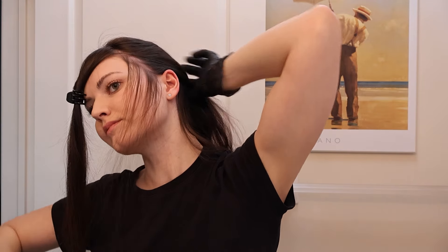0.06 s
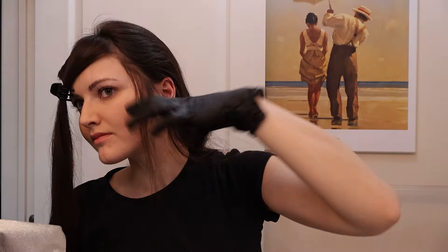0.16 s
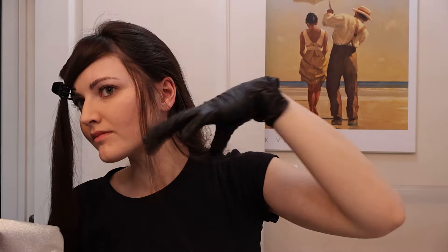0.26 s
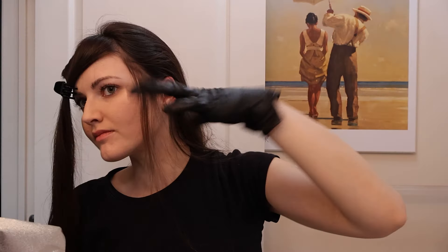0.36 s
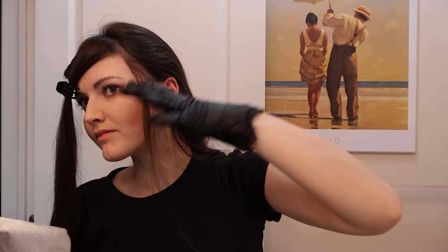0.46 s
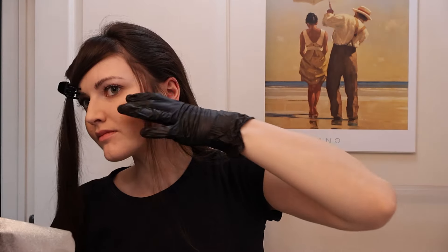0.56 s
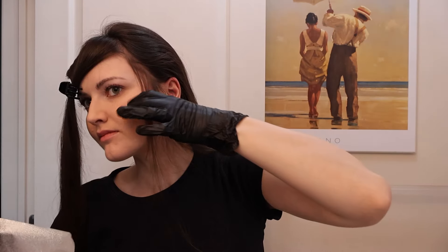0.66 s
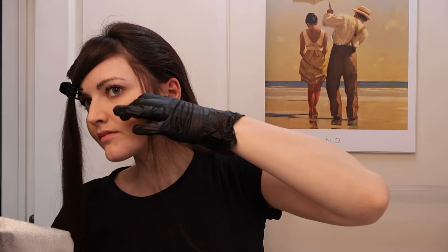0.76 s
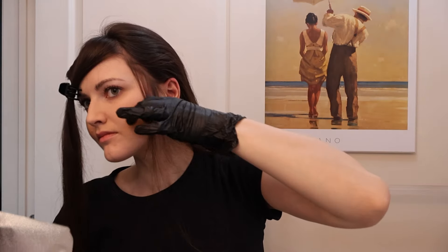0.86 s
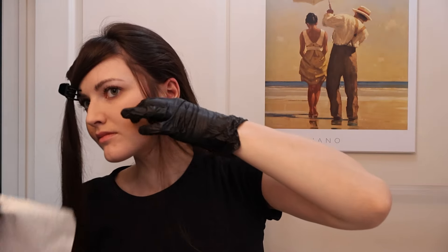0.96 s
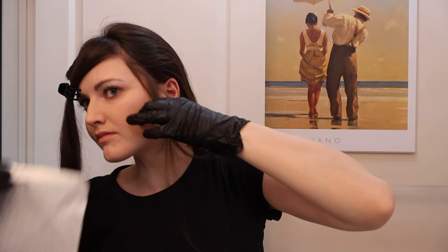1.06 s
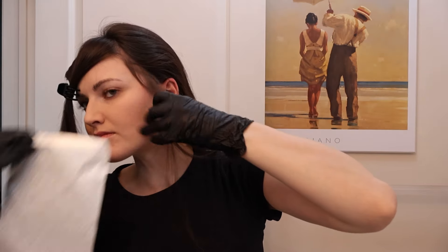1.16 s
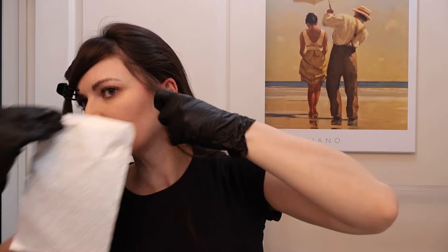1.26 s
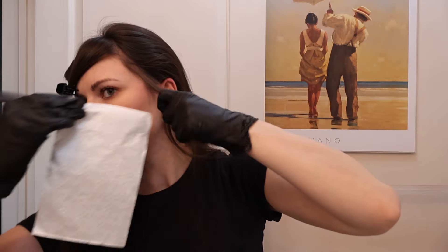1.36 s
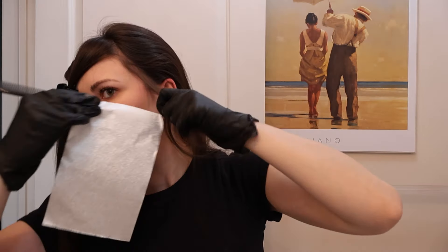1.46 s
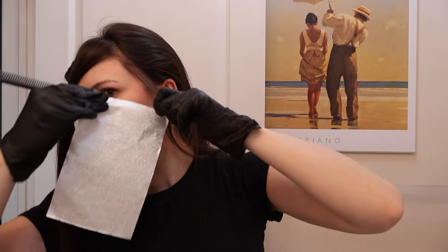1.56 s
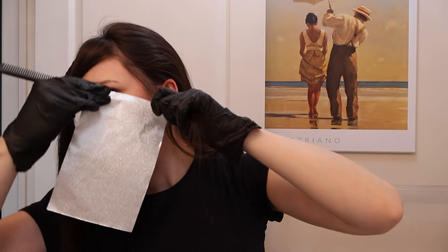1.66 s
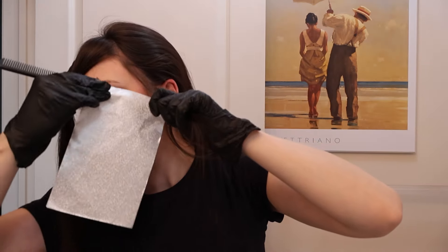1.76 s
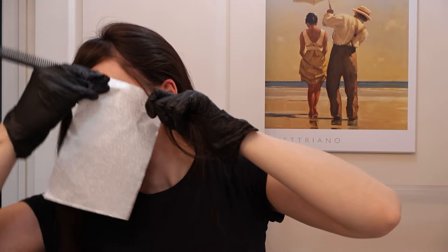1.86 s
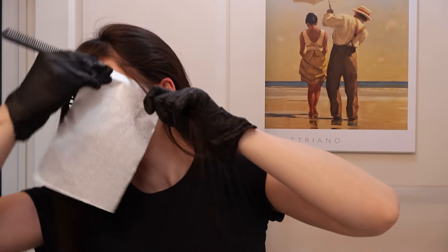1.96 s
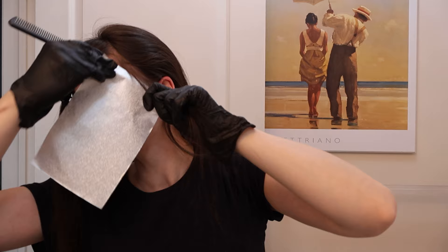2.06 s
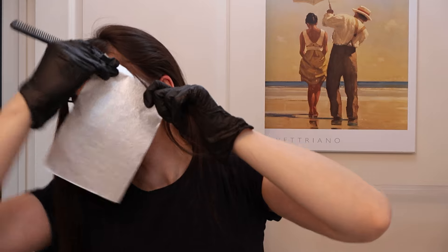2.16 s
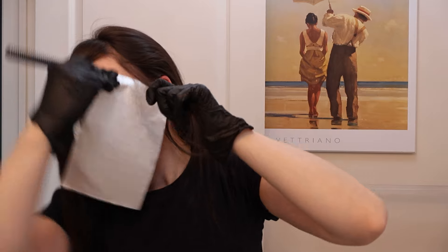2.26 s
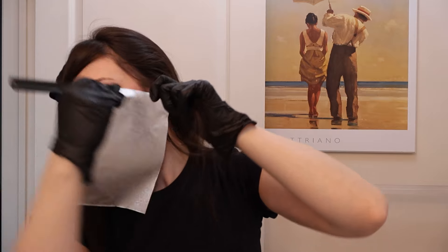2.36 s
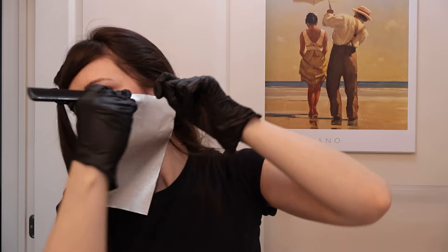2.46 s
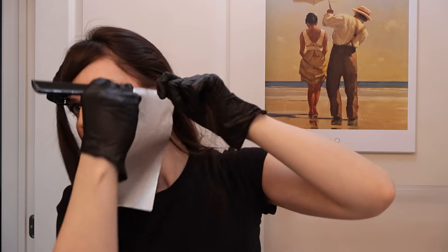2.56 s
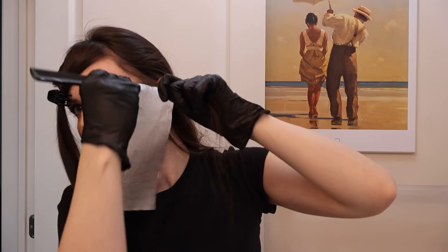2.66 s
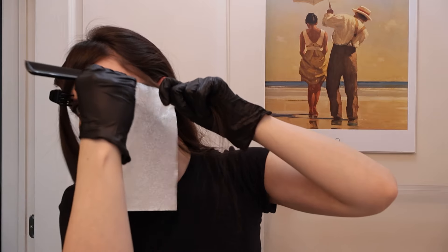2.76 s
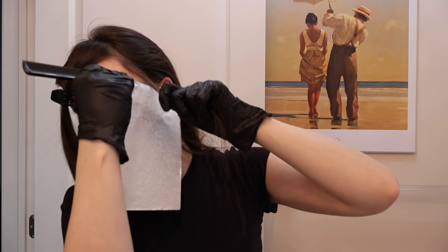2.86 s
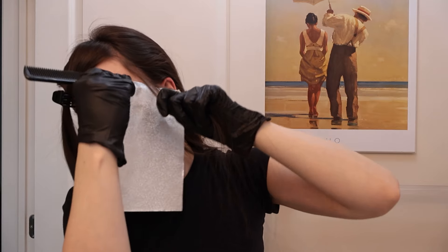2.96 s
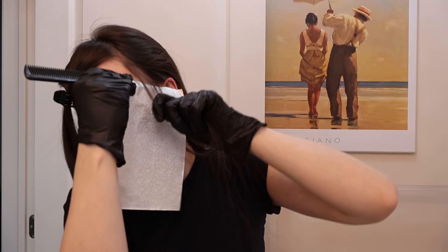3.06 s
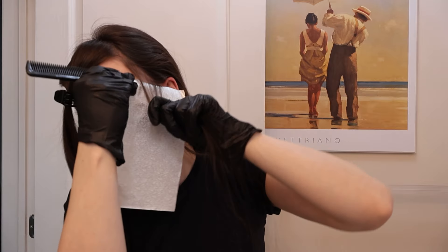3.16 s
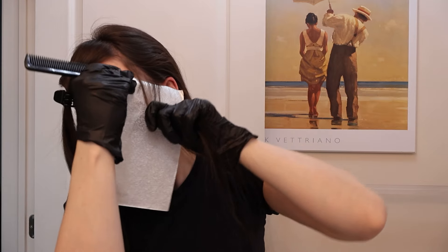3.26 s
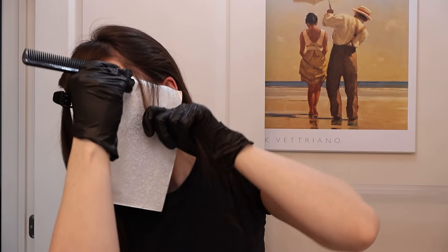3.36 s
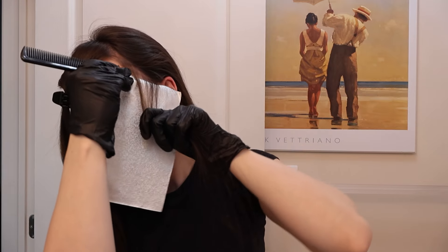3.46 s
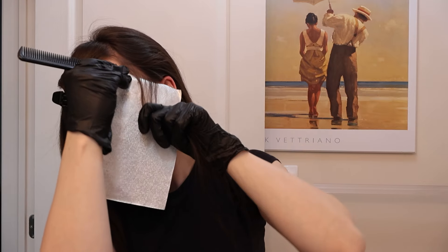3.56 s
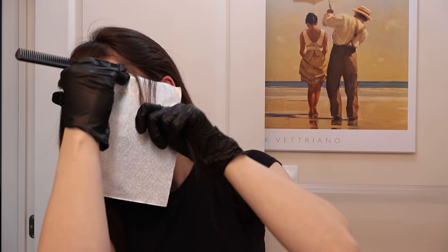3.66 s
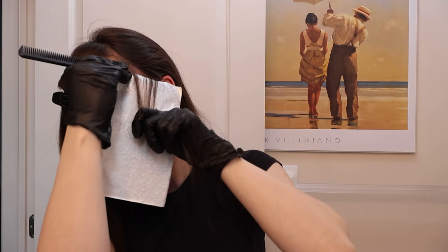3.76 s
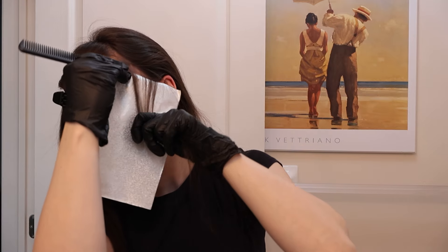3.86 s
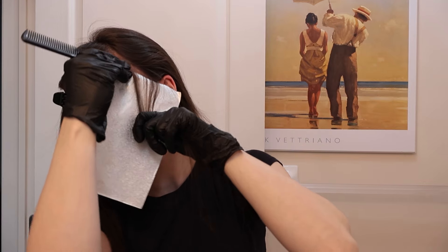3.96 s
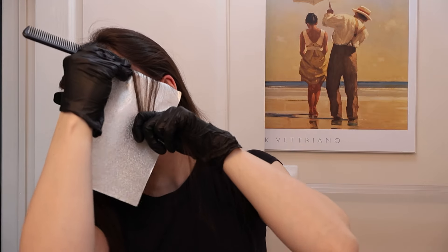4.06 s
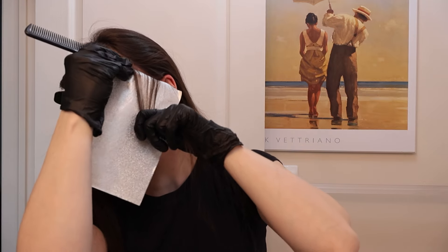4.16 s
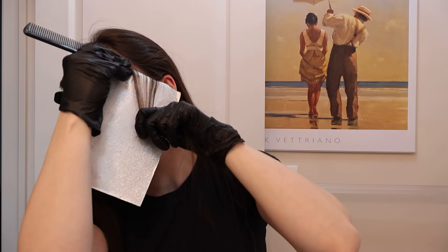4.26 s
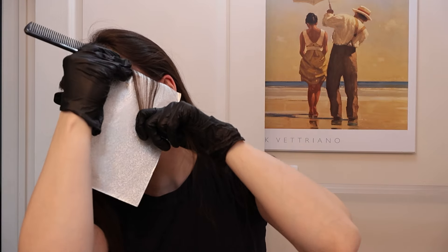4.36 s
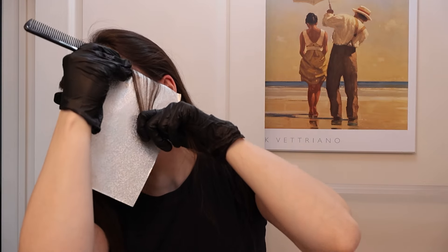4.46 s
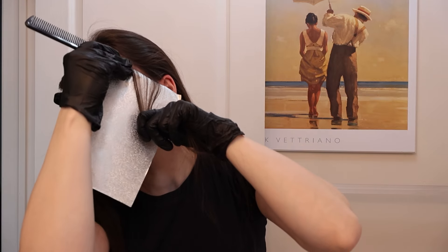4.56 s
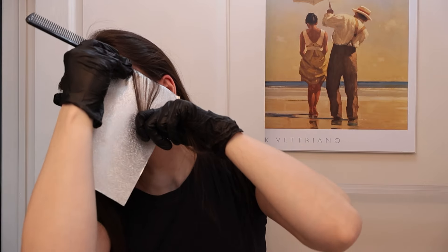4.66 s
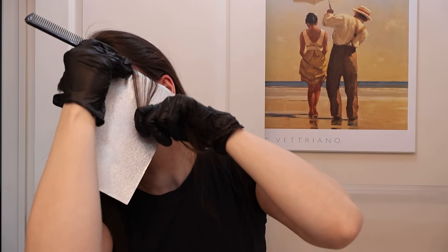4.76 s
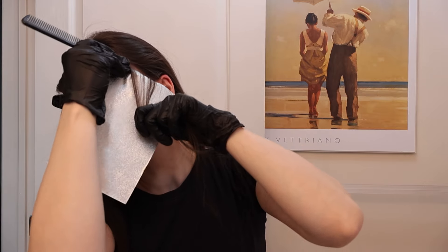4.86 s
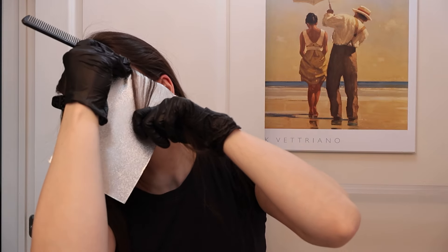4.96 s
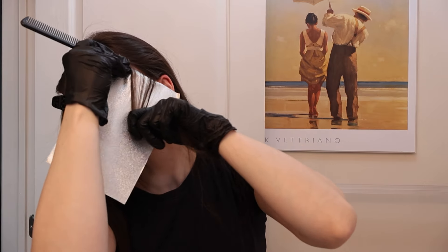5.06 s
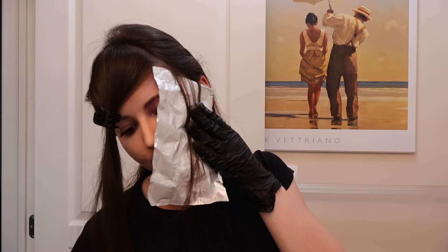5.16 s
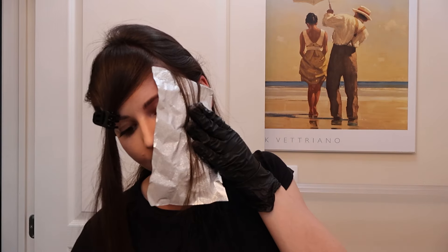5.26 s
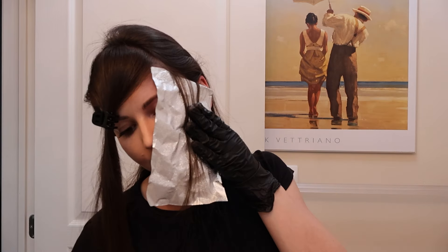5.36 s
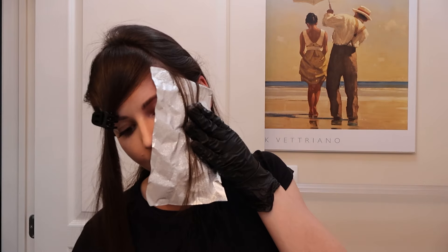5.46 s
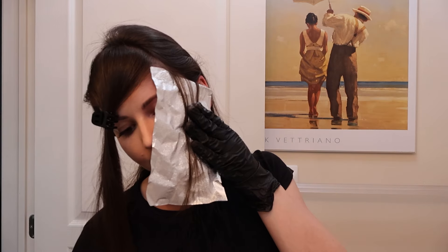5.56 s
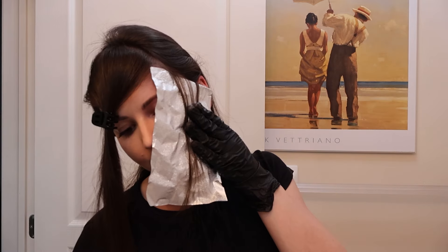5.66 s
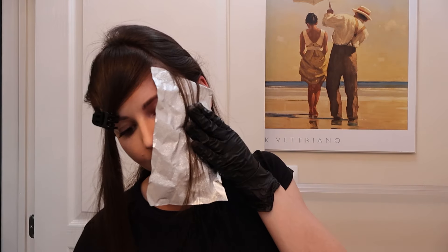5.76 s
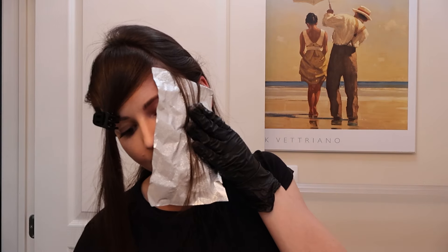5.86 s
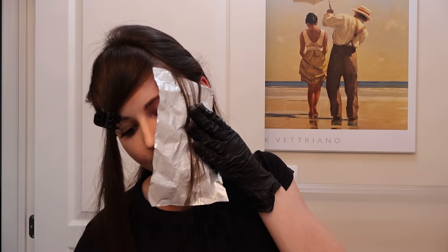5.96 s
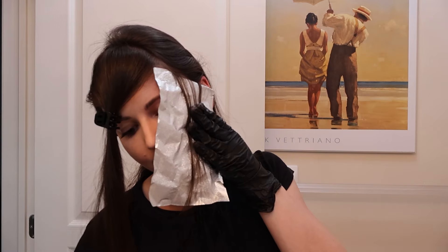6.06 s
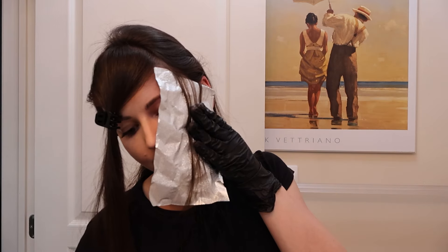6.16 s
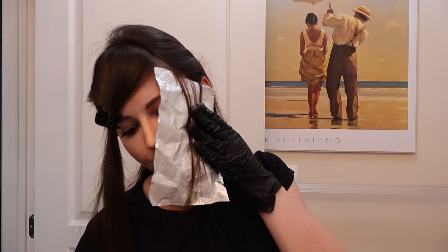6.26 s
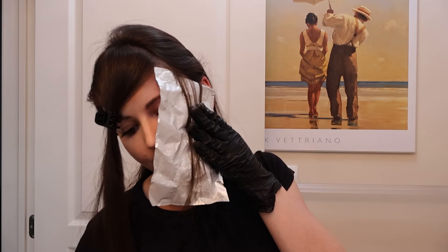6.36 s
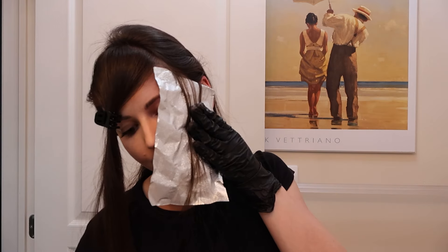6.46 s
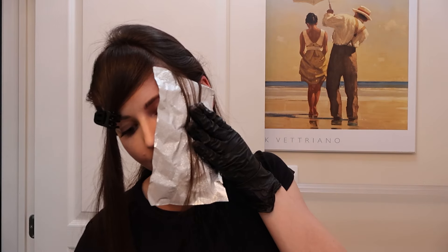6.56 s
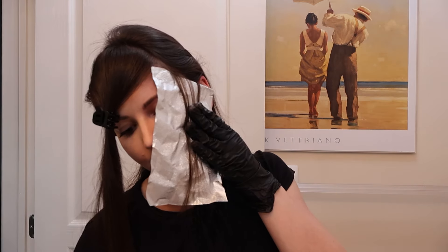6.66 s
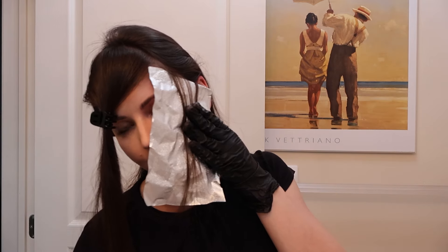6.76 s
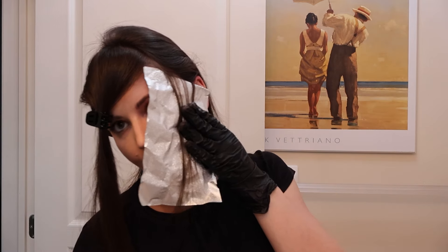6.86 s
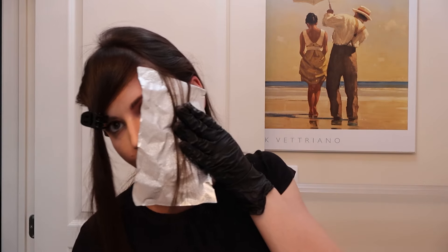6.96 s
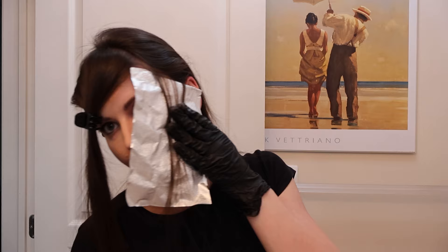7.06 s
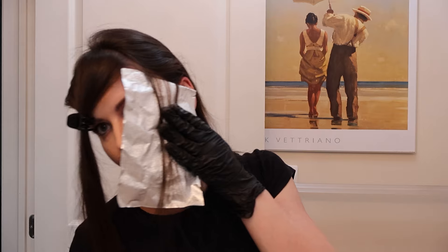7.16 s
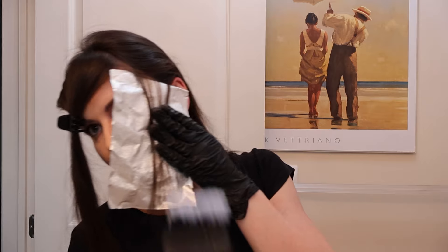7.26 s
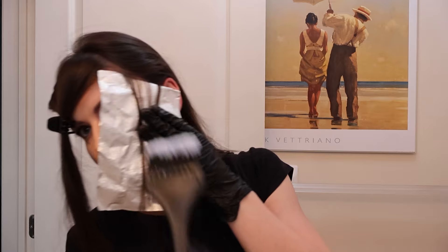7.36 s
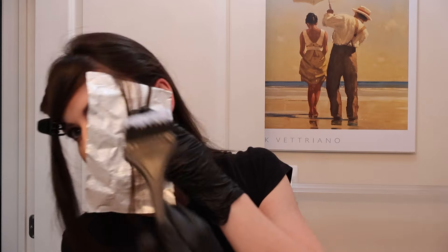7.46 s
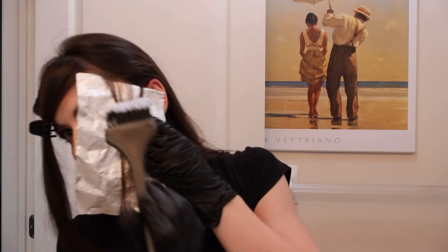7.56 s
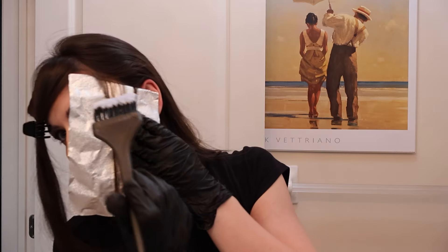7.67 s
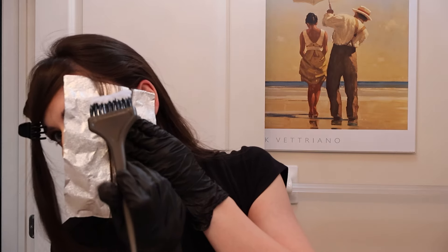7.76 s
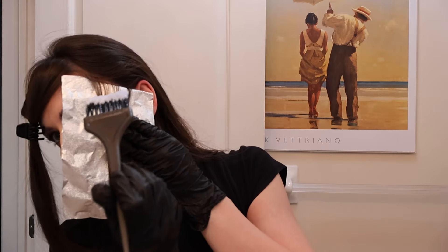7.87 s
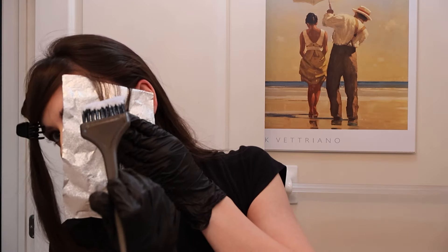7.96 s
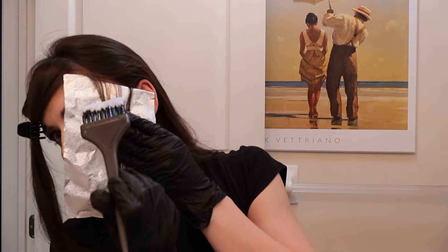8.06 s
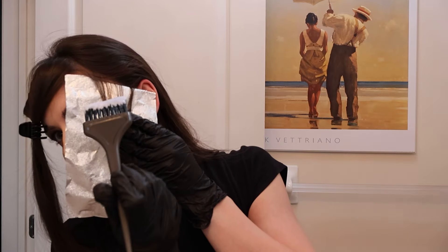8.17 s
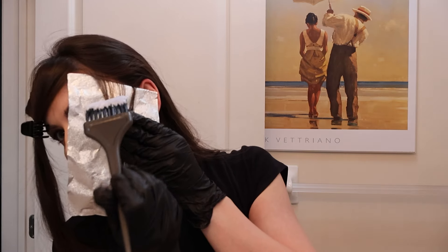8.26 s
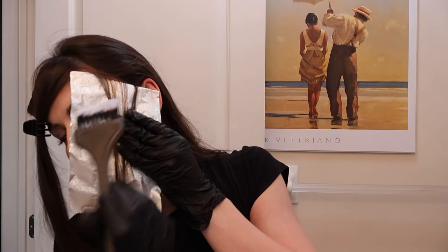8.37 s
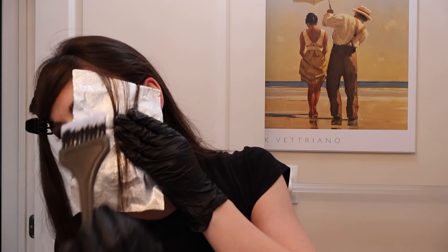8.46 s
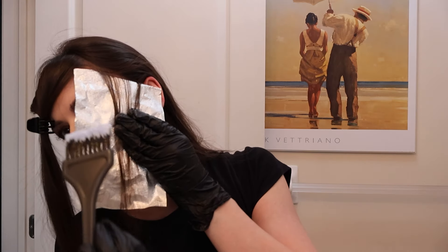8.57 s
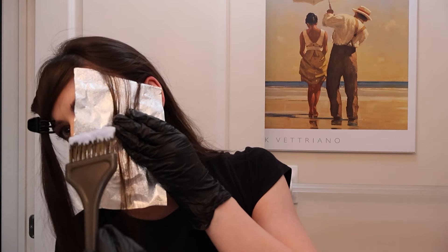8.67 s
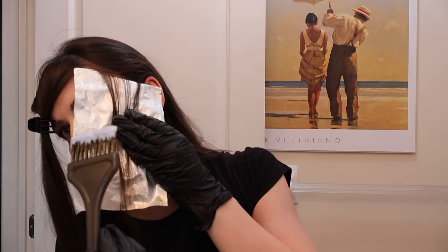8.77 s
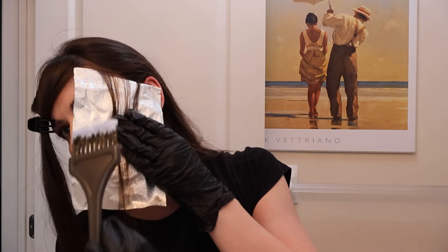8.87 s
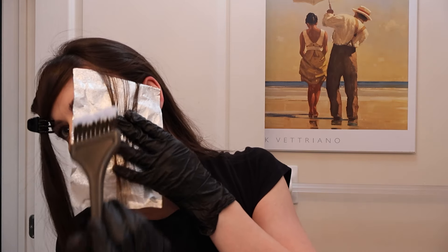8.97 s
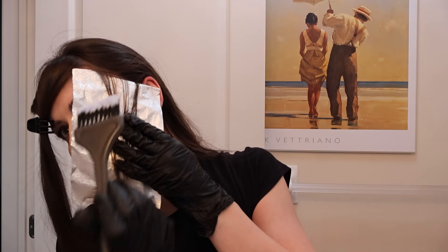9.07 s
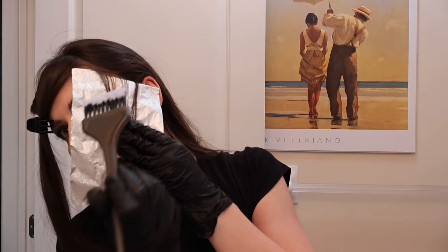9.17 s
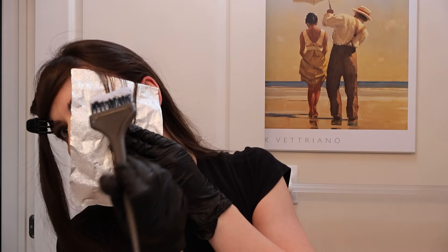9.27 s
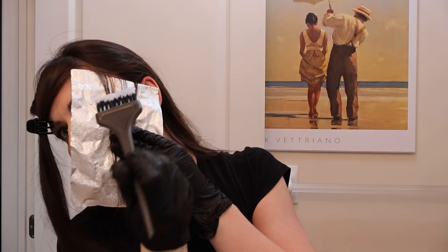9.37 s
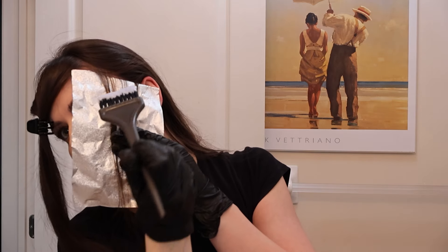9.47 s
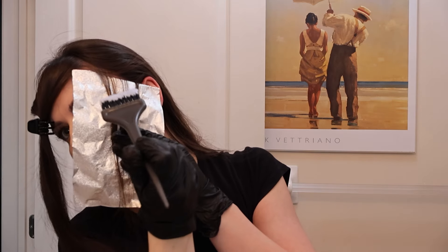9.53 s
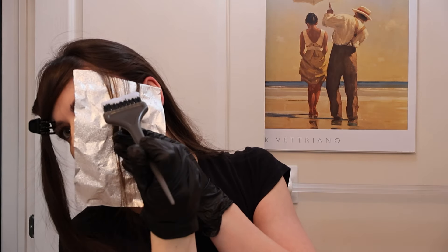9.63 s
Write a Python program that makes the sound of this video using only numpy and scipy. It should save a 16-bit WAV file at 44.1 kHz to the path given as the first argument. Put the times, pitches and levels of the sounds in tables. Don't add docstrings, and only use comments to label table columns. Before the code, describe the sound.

Aluminium foil crackles and snaps in gloved hands in a small room, then stiff brush dabs scratch and tick across the sheet.

```python
import sys
import numpy as np
from scipy import signal
from scipy.fft import rfft, irfft
from scipy.io import wavfile
from scipy.ndimage import uniform_filter1d

SR = 44100
rng = np.random.default_rng(int(sys.argv[2]) if len(sys.argv) > 2 else 0)


def gain_from_db(level_db):
    decades = np.asarray(level_db, float) / 20
    return 10 ** decades


def put_to_file(sound):
    columns = np.atleast_2d(sound).T
    safe = np.clip(columns, -1, 1)
    whole_steps = np.round(safe * 32767)
    wavfile.write(sys.argv[1], SR, whole_steps.astype(np.int16))


N = 427769
T = np.arange(N) / SR
SPLICE_S = 5.153
TOP_HZ = 15900

# start_s [s], peak_db [dB], panel_hz [Hz], whole_sheet_share_db [dB]
LIFT_SNAPS = [(0.452, -43, 1040, 2), (1.269, -31, 5020, -17), (1.591, -14, 2130, -14.5),
              (1.855, -19.5, 2410, -14.5), (2.032, -20, 2380, -13), (2.293, -21.5, 6700, -10.5),
              (2.359, -29.5, 1240, -8), (2.402, -18, 2700, -4), (2.514, -15, 3070, -16),
              (2.657, -15, 2280, -14), (2.749, -20, 8900, -16), (2.859, -22, 7210, -7),
              (2.909, -28, 1230, -20), (2.952, -19, 2770, -25)]
SETTLE_SNAPS = [(3.211, -24, 8270, -12), (3.358, -40, 8400, 1), (3.424, -17, 2490, -23),
                (3.729, -44, 2420, -2), (3.809, -33, 8600, -6), (3.988, -23.5, 3080, -4),
                (4.002, -20.5, 6640, -1.5), (4.484, -20.5, 5140, -13), (4.522, -23.5, 5300, -14),
                (4.675, -34, 690, -2.5), (4.918, -27.5, 10000, -10), (5.015, -35, 8350, -9)]
BRUSH_SNAPS = [(5.679, -40.5, 5910, -6), (6.594, -49, 4680, -2), (6.88, -26.5, 3200, -10),
               (7.127, -44, 4950, 0), (7.171, -37, 8850, -3), (7.182, -34, 8700, -2),
               (7.229, -36, 8900, -8), (7.315, -36, 8910, 0), (8.068, -39, 8740, -14),
               (8.297, -30, 8440, -12), (8.479, -31.5, 860, -2), (8.526, -18, 9000, -1),
               (8.542, -16, 12600, -6), (8.616, -26, 8650, -12), (8.867, -36, 5000, -6),
               (8.89, -34, 8500, -2.5), (9.049, -14, 13400, -12.5), (9.235, -19.5, 2900, -15.5),
               (9.324, -16, 9300, -12), (9.384, -34, 8500, -9), (9.47, -39, 7950, -8),
               (9.593, -32, 8100, 1.5)]
DRY_TICKS = [(1.198, -35, 5800, -25), (1.251, -44, 8860, -2), (1.415, -38, 7900, -2.5),
             (1.5804, -17, 8450, -6), (2.571, -19.5, 2800, -16), (3.1064, -24, 8850, -13),
             (4.774, -33, 8920, -9), (5.547, -42, 8800, -7), (5.888, -41, 3670, -9.5),
             (5.978, -42, 4700, -7), (8.623, -30, 8900, -8), (8.661, -19, 12800, -25),
             (8.67, -31, 13200, 1), (8.727, -26, 8700, -21)]
SLOW_FOLDS = [(0.918, -23, 6600, -24), (1.081, -34, 7600, -16), (1.5508, -26.5, 4000, 0.5),
              (1.561, -23, 7570, 3.5), (1.845, -23, 9000, -6.5), (2.457, -12, 2900, -8.5),
              (1.974, -20, 5500, -24), (2.173, -17.5, 4900, -35), (4.246, -34.5, 4700, 0.5),
              (8.328, -35, 8450, -26), (9.025, -27.5, 13500, -1.5), (9.291, -17.5, 9100, -14)]


def log_gain(table, size):
    hz, db = np.transpose(table)
    grid_hz = np.arange(size // 2 + 1) * SR / size
    return np.log(gain_from_db(np.interp(np.log(grid_hz + 1), np.log(hz), db)))


def causal(table, size=2048):
    cepstrum = irfft(log_gain(table, size))
    cepstrum[1:size // 2] *= 2
    cepstrum[size // 2 + 1:] = 0
    return irfft(np.exp(rfft(cepstrum)))[:size // 2]


def convolve(x, response):
    return signal.oaconvolve(x, response)[:len(x)]


def spliced(x, before, after):
    cut = int(SPLICE_S * SR)
    return np.concatenate([convolve(x[:cut], before), convolve(x[cut:], after)])


def room_left(start_s, start, size):
    return min(size, int(SPLICE_S * SR) - start) if start_s < SPLICE_S else size


def unit(x):
    return x / np.sqrt(np.mean(x ** 2))


def walk(rate):
    hold = int(SR / rate)
    levels = np.repeat(rng.standard_normal(N // hold + 1), hold)
    return uniform_filter1d(levels, hold)[:N]


def fading(t60_s, noise):
    return noise * 1000 ** (-np.arange(noise.shape[-1]) / SR / t60_s)


def twin_peak(hz, q, x):
    peak = signal.iirpeak(hz, q, fs=SR)
    return signal.lfilter(*peak, signal.lfilter(*peak, x))


def responses(count, t60_s, ring_db, room_s, room_db):
    noise = rng.standard_normal((count, 2, 9000))
    out = gain_from_db(ring_db) * fading(t60_s, noise[:, 0])
    out[:, 150:] += gain_from_db(room_db) * fading(room_s, noise[:, 1, 150:])
    out[:, 0] = 1
    return out


def rustle(rate, scatter_db, level_db):
    chance = rng.random(N) < rate / SR * gain_from_db(4.0 * walk(60))
    sizes = gain_from_db(scatter_db * np.minimum(rng.exponential(size=N), 2.5))
    signs = rng.choice([-1, 1], N)
    return unit(chance * sizes * signs) * gain_from_db(level_db)


def stroke(t, start_s, hold_s, rise_db_s, fall_db_s):
    before_s = np.maximum(start_s - t, 0)
    after_s = np.maximum(t - start_s - hold_s, 0)
    return -rise_db_s * before_s - fall_db_s * after_s


def hiss():
    # pitch_hz [Hz], density_db [dB per Hz]
    mid_spectrum = [(15, -48), (25, -7), (59, -2), (81, -5.5), (265, -5), (396, -7), (491, -8.5),
                    (3770, -16.5), (4200, -17.5), (4550, -17.5), (15200, -19.5)]
    # pitch_hz [Hz], density_db [dB per Hz]
    side_spectrum = [(15, -29), (25, 1), (120, -3.5), (206, -7), (236, -8.5), (1700, -18), (13600, -18),
                     (16000, -25)]
    # pitch_hz [Hz], level_db [dB]
    hum_tones = [
        (57, -88),
        (120, -81.5),
    ]
    mid_db, side_db = -58, -70.5

    noises = []
    for spectrum in (mid_spectrum, side_spectrum):
        white = rfft(rng.standard_normal(N + 1))
        noises.append(unit(irfft(white * np.exp(log_gain(spectrum, N + 1)))[:N]))
    mid, side = noises
    hum = sum(gain_from_db(db + 2.0 * walk(14)) * np.sqrt(2) * np.sin(2 * np.pi * hz * T) for hz, db in hum_tones)
    mid = mid * gain_from_db(mid_db + 0.5 * walk(2.82)) + hum
    return mid + gain_from_db(side_db) * side * np.array([[1], [-1]])


def ping():
    # pitch_hz [Hz], level_db [dB], t60_s [s]
    rod_modes = [(3200, -10, .1), (4820, 3, 0.048), (6500, -14, .08), (8250, -8, 0.094), (10300, -14, .08),
                 (11100, -8, .04), (12400, -12, .06), (13950, -3, .03)]
    start_s, peak_db, scrape_s = 9.593, -33, 0.0047

    age = np.maximum(T - start_s, 0)
    scrape = rng.standard_normal(N) * (T > start_s) * np.exp(-(age / scrape_s) ** 2)
    t = T[:9000]
    rod = sum(gain_from_db(db) * np.sin(2 * np.pi * hz * t) * 1000 ** (-t / t60_s) for hz, db, t60_s in rod_modes)
    rung = convolve(scrape, rod)
    return gain_from_db(peak_db) * rung / np.abs(rung).max()


def knocks():
    # start_s [s], peak_db [dB], low_hz [Hz],
    # high_hz [Hz], tail_db [dB re step]
    knock_steps = [(1.857, -20, 2200, 14000, -24), (2.449, -28, 1000, 3560, -9),
                   (2.852, -33, 2500, 9000, -20), (3.36, -33, 3200, 5500, -15),
                   (3.395, -29.5, 1500, 7460, -25), (4.036, -40, 3000, 9500, -19),
                   (4.925, -37, 7500, 14000, -18), (5.023, -38, 7500, 14000, -16),
                   (5.0389, -27.5, 1490, 4970, -12.5), (5.044, -36, 9000, 15000, -20),
                   (5.1077, -22.5, 1790, 6000, -18.5), (5.12, -24.5, 1490, 6000, -15.5),
                   (7.133, -45, 3000, 6000, -10), (7.512, -45, 2000, 4000, -20),
                   (7.574, -49, 1500, 2600, -16), (7.598, -39, 1500, 3998, -16),
                   (7.627, -43, 1700, 4000, -20), (7.646, -39, 1300, 4000, -23),
                   (7.8655, -31, 900, 7500, -27), (7.8855, -24.5, 2960, 5400, -15),
                   (7.9246, -36, 400, 1200, -14), (7.979, -31, 696, 4170, -23),
                   (8.205, -36, 900, 5000, -17.5), (8.81, -43, 560, 800, -20),
                   (9.019, -40, 1000, 4000, -20), (9.1175, -30, 400, 1900, -19),
                   (9.154, -37, 800, 3200, -28), (9.175, -26, 700, 3200, -20),
                   (9.245, -21, 3600, 9500, -22), (9.4532, -26, 400, 2820, -21.5),
                   (9.5622, -30, 1200, 4500, -24), (9.5722, -21, 603, 3200, -19),
                   (3.3595, -35.5, 7500, 10500, -17), (3.425, -32.5, 1100, 4800, -5),
                   (4.484, -26, 650, 7000, -12.5), (7.885, -31, 7500, 9600, -21),
                   (7.9247, -30.5, 3800, 5800, -21), (9.562, -37, 7400, 10000, -13),
                   (7.757, -51, 1500, 4000, -24), (5.015, -39, 7500, 14000, -18),
                   (1.578, -24, 1260, 1500, -4.5), (1.5809, -21, 1000, 9000, -24),
                  (1.5925, -23, 1500, 6000, -22), (1.862, -31, 4000, 9000, -22),
                  (2.034, -31, 1000, 3200, -8), (2.403, -30, 1200, 5500, -16),
                  (2.657, -23, 1600, 3200, -10), (2.768, -31, 3500, 7000, -20),
                  (2.785, -26.5, 800, 3500, -12), (2.874, -26, 900, 4500, -22),
                  (2.928, -30, 1000, 3500, -20), (2.934, -29, 1500, 4000, -20),
                  (3.1064, -33, 1500, 6500, -20), (3.381, -39, 3000, 6000, -18),
                  (3.4317, -33, 2000, 5500, -18), (3.455, -38, 2000, 5000, -18),
                  (4.313, -42, 520, 1393, -14), (4.4155, -46, 520, 1500, -21), (4.672, -41, 600, 2600, -14),
                  (7.885, -34, 463, 2900, -21), (7.962, -41, 595, 5000, -22), (8.011, -45, 400, 1667, -16),
                  (8.841, -41, 1500, 5000, -19), (8.891, -39, 800, 6000, -24),
                  (8.906, -36, 3500, 5500, -13), (9.051, -39.5, 450, 1300, -18),
                  (9.245, -31, 900, 4320, -21), (9.323, -31, 500, 3704, -18)]
    rattle_db, rattle_t60_s, tail_t60_s = -11, 0.025, 0.14

    out = np.zeros(N + 9000)
    for start_s, db, lo_hz, hi_hz, tail_db in knock_steps:
        band = signal.butter(2, [lo_hz, hi_hz], "bandpass", fs=SR, output="sos")
        x = responses(1, rattle_t60_s, rattle_db, tail_t60_s, tail_db)[0]
        step = signal.sosfilt(band, signal.unit_impulse(len(x)))
        x[0] = np.linalg.norm(step) / np.abs(step).max()
        x = signal.sosfilt(band, x) / np.linalg.norm(step)
        start = int(start_s * SR)
        size = min(len(x), int((SPLICE_S - start_s) * SR)) if start_s < SPLICE_S else len(x)
        out[start:start + size] += gain_from_db(db) * x[:size]
    return out[:N]


def hollows():
    # start_s [s], hold_s [s], level_db [dB], hollow_hz [Hz], sharpness_q [Q]
    rubs = [(1.6, 0.05, -50, 1380, 6.6), (1.571, .01, -50, 1380, 11), (1.588, 0.013, -53.5, 210, 0.61),
            (1.579, 0.023, -40.5, 775, 2.1), (1.582, 0.012, -40, 2250, 2.5), (1.603, 0.035, -48, 2100, 1.3),
            (1.67, 0.038, -55.5, 1630, 1.2), (5.05, .02, -48, 1380, 1.6), (4.25, 0.022, -50.5, 3200, 2.2),
            (2, 0.024, -56, 750, 5.5), (3.11, .03, -51, 2900, 2.6), (1.848, 0.014, -47, 2340, 5.4),
            (1.907, .066, -61, 2500, 8), (2.365, .1, -51, 1260, 5.3), (2.77, 0.044, -45, 2200, 8.2),
            (2.75, 0.14, -47, 2900, 6.3), (2.902, 0.033, -39.5, 2300, 1.6), (2, .17, -44.5, 4850, 3.1),
            (2.887, 0.1, -57.5, 432, 8), (3.143, 0.073, -61.5, 740, 0.98), (3.432, 0.02, -46.5, 2650, 0.93),
            (3.517, 0.022, -50, 1360, 0.45), (3.74, .02, -54, 1100, 0.5), (3.881, 0.017, -50.5, 1130, 0.6),
            (4.312, 0.11, -54, 970, 0.61), (4.607, 0.026, -55, 910, 1.1), (4.68, 0.012, -48, 1250, 1.2),
            (4.674, .03, -54.5, 750, 6), (4.83, 0.084, -57, 1100, 0.73), (7.29, 0.358, -60, 346, 1.4),
            (7.553, 0.075, -67, 1930, 3), (8.399, 0.17, -53.5, 663, 5), (8.458, 0.086, -50, 886, 9.2),
            (8.672, 0.025, -53.5, 715, 4.4), (8.832, 0.016, -57, 730, 2.5), (8.899, .018, -55, 2350, 10),
            (8.928, .045, -58, 2200, 11), (8.88, 0.041, -58.5, 900, 5.5), (0.9, 0.062, -53.5, 5700, 8.3),
            (9.05, 0.008, -54, 510, 1.6)]
    rise_db_s, fall_db_s = 902, 278

    grains = rustle(1500, 3.3, 0)
    out = np.zeros(N)
    for start_s, hold_s, db, hz, q in rubs:
        part = slice(int((start_s - 0.1) * SR), min(int((start_s + hold_s + 0.25) * SR), N))
        rung = unit(twin_peak(hz, max(q, 0.5), grains[part]))
        out[part] += rung * gain_from_db(db + stroke(T[part], start_s, hold_s, rise_db_s, fall_db_s))
    return out


def tilted(db, tilt_db, k):
    flex_droop_db = 8
    return db + k * tilt_db - flex_droop_db * (k > 1)


def handling(k):
    # [dB per scale, towards large buckles]
    resting_grip = [(0.0, -57, -2), (0.65, -62.5, -2), (1.2, -57.5, -1.5), (1.5, -50.5, -2.5),
                    (1.72, -57, -7), (1.9, -68, 9.5), (2.2, -54.5, 3.5), (3.1, -48.5, -2), (3.6, -51.5, -4),
                    (4.3, -67, 4), (4.8, -45.5, -7), (5.03, -51.5, -2), (5.17, -64.5, 0),
                    (7.0, -62.5, -0.5), (8.2, -60.5, -0.5), (8.5, -60.5, 6.5), (9.3, -60, -10),
                    (9.7, -60, -4)]
    # start_s [s], level_db [dB]
    glove_rub = [(0.0, -62.5), (0.7, -66), (1.5, -64), (1.6, -52), (1.8, -66), (2.1, -50), (2.45, -54.5),
                 (2.9, -55.5), (3.3, -58.5), (4.3, -61), (5.1, -49), (5.2, -66.5), (7.0, -67), (7.45, -62),
                 (7.8, -64), (8.2, -66), (8.42, -51), (9.7, -71)]
    # start_s [s], hold_s [s], crease_db [dB], tilt_db [dB per scale]
    hand_moves = [(0.726, .01, -45.5, -12), (0.911, 0.052, -44, -25), (1.079, 0.013, -46, -35),
                  (1.273, 0.031, -41.5, -8.5), (1.58, 0.0091, -40, -16), (1.593, 0.0077, -51, 9.5),
                  (1.851, 0.0076, -39, -15), (1.952, 0.027, -31, -8), (2.026, 0.12, -35, -5),
                  (2.168, 0.076, -41, -3), (2.296, 0.062, -38, -11), (2.413, 0.012, -47.5, 9.5),
                  (2.48, 0.01, -37.5, 2.5), (2.624, 0.037, -42.5, 0), (2.666, 0.095, -36, -4),
                  (2.764, 0.028, -31.5, -4), (2.845, 0.018, -31.5, -1.5), (2.897, 0.013, -50.5, 8.5),
                  (2.961, 0.011, -34, -5), (3.05, 0.015, -41.5, -8), (3.107, 0.017, -41, -2.5),
                  (3.203, 0.016, -38, -8), (3.345, 0.03, -56, -4), (3.423, 0.048, -64.5, 9.5),
                  (3.67, .02, -49.5, -4), (3.73, 0.021, -44, 0), (3.785, 0.037, -46, -4),
                  (3.89, 0.058, -48.5, -1.5), (3.988, 0.16, -44, -5), (4.248, 0.019, -41.5, -6.5),
                  (4.52, 0.045, -47.5, -2), (4.33, 0.17, -50.5, -7), (4.93, .06, -49.5, -20),
                  (5.05, 0.022, -64, 7.5), (5.07, 0.043, -59, 6), (2.48, 0.054, -45, 4),
                  (5.087, 0.016, -47, -5), (4.565, .01, -46.5, -8), (1.57, .02, -45, -18)]
    # start_s [s], hold_s [s], crease_db [dB], tilt_db [dB per scale]
    brush_moves = [(6.885, 0.0054, -44.5, -9), (7.16, 0.078, -52.5, -3), (7.347, 0.011, -56, 1.5),
                   (7.416, 0.15, -66.5, 6.5), (7.87, 0.013, -48.5, -1.5), (7.937, .015, -53, 2),
                   (8.333, 0.0093, -42.5, -0.5), (8.432, 0.066, -45.5, -1.5), (8.5, 0.018, -41, -0.5),
                   (8.529, .012, -32, -4.5), (8.657, 0.023, -41, -3.5), (8.881, 0.08, -47, -2.5),
                   (9.044, .01, -42.5, -3), (9.123, 0.048, -46.5, 1.5), (9.234, 0.067, -47, 2.5),
                   (9.32, 0.039, -45, -5.5), (9.46, .01, -73, 12.5), (9.573, .012, -50, 3)]

    if k > 2:
        return np.interp(T, *np.transpose(glove_rub))
    rise_db_s = 463
    fall_db_s = [260, 233, 174][k]
    t = T[::64]
    grip_s, grip_db, grip_tilt_db = np.transpose(resting_grip)
    start_s, hold_s, peak_db, lean_db = np.array(hand_moves + brush_moves).T[:, :, None]
    moves_db = tilted(peak_db, lean_db, k) + stroke(t, start_s, hold_s, rise_db_s, fall_db_s)
    resting_db = np.interp(t, grip_s, tilted(grip_db, grip_tilt_db, k))
    power = gain_from_db(2 * moves_db).sum(axis=0) + gain_from_db(2 * resting_db)
    return np.interp(T, t, 10 * np.log10(power))


def patches(spots, lo_hz, hi_hz):
    patch_q, patch_db = 4.2, -4.5
    centres_hz = lo_hz * (min(hi_hz, TOP_HZ) / lo_hz) ** rng.random(len(spots))
    lifted = []
    for hz, spot in zip(centres_hz, spots):
        resonance = signal.lfilter(*signal.iirpeak(hz, patch_q, fs=SR), spot)
        lifted.append(spot + gain_from_db(patch_db) * resonance)
    return lifted


def snaps(peak_db, shapes):
    tick_step_db, tick_ring_db, tick_t60_s = 8.5, 1, 0.98
    fold_rise_s, lag_s = 0.0018, 0.0008
    pressed_t60_s = 0.58

    out = np.zeros(N + shapes.shape[1])
    age = np.arange(shapes.shape[1]) / SR
    steady = np.ones(len(age))
    tick_gain = gain_from_db(np.where(age > 0, tick_ring_db, tick_step_db)) * fading(tick_t60_s, steady)
    fold_gain = 1 - np.exp(-age / fold_rise_s)
    kinds = [(DRY_TICKS, tick_gain), (SLOW_FOLDS, fold_gain), (LIFT_SNAPS + SETTLE_SNAPS, steady),
             (BRUSH_SNAPS, fading(pressed_t60_s, steady))]
    moments = [(row[0], gain) for rows, gain in kinds for row in rows]
    for (start_s, gain), db, shape in zip(moments, peak_db, shapes):
        start = int((start_s + lag_s) * SR)
        size = room_left(start_s, start, len(shape))
        out[start:start + size] += gain_from_db(db) * (gain * shape)[:size]
    return out[:N]


def panels(events):
    panel_db, panel_q, panel_t60_s = -11, 4.5, 0.045
    shapes = []
    for hz, x in zip(events[:, 2], responses(len(events), panel_t60_s, -7, 0.2, -21)):
        rung = twin_peak(hz, panel_q, x)
        shapes.append(rung / np.abs(rung).max())
    return snaps(events[:, 1] + panel_db, np.array(shapes))


def foil():
    # pitch_hz [Hz], density_db [dB per Hz]
    loose_tone = [(150, -19.5), (560, -5), (1050, -2), (1330, 1), (1620, -5.5), (2400, -0.5), (3700, -0.5),
                  (5000, -3), (7300, -7.5), (8800, -4), (10400, -12.5), (13400, -8.5), (16000, -16)]
    # pitch_hz [Hz], density_db [dB per Hz]
    pressed_tone = [(150, -28), (520, -10.5), (660, -2.5), (920, -0.5), (1200, -3.5), (1900, -5.5),
                    (2400, -2), (4800, -1), (7200, -1.5), (8700, 2.5), (11000, -5), (13200, 2), (16000, -9)]
    # low_hz [Hz], high_hz [Hz], grain_rate [per s], size_scatter_db [dB], ring_t60_s [s],
    # ring_db [dB], rustle_db [dB], snap_db [dB], room_t60_s [s], room_db [dB]
    motion_scales = [
        (5020, 17300, 5000, 6, 0.05, -16, -4.5, 4, 0.13, -21),
        (1654, 6750, 2000, -1.5, 0.1, -13.5, -5.5, 0, 0.24, -22.5),
        (568, 2310, 500, 2.5, 0.11, -22, -2, -0.5, 0.42, -29.5),
        (169, 596, 1500, 2, 0.14, -20.5, -9, -6.5, 0.44, -29.5),
    ]
    up_db_oct, down_db_oct = 5, 6

    events = np.array(DRY_TICKS + SLOW_FOLDS + LIFT_SNAPS + SETTLE_SNAPS + BRUSH_SNAPS)
    out = panels(events)
    for k, (lo_hz, hi_hz, rate, scatter_db, t60_s, ring_db, rustle_db, snap_db, *room) in enumerate(motion_scales):
        band = signal.butter(4, [lo_hz, hi_hz], "bandpass", fs=SR, output="sos")
        tones = [signal.sosfilt(band, causal(tone)) for tone in (loose_tone, pressed_tone)]

        grains = rustle(rate, scatter_db, handling(k) + rustle_db)
        place = np.repeat(rng.integers(0, 6, N // 700 + 1), 700)[:N]
        spots = patches(responses(6, t60_s, ring_db, *room), lo_hz, hi_hz)
        shower = np.zeros(N)
        for p, spot in enumerate(spots):
            shower += spliced(grains * (place == p), spot, spot) / np.linalg.norm(spot)
        out = out + spliced(shower, *(tone / np.linalg.norm(tone) for tone in tones))

        octaves = np.log2(np.sqrt(lo_hz * hi_hz) / events[:, 2])
        share_db = events[:, 3] - np.maximum(up_db_oct * octaves, -down_db_oct * octaves)
        shapes = responses(len(events), t60_s, ring_db, *room)
        hits = snaps(events[:, 1] + share_db + snap_db, shapes)
        out = out + spliced(hits, *(tone / np.abs(tone).max() for tone in tones))
    return out


def scene():
    return hiss() + ping() + knocks() + hollows() + foil()


def roll_off(x):
    return signal.sosfilt(signal.butter(12, 15950, fs=SR, output="sos"), x)


def record(dry):
    top = signal.ellip(12, 0.2, 60, TOP_HZ, fs=SR, output="sos")
    mix = signal.sosfilt(top, dry)
    return roll_off(mix)


dry = scene()
out = record(dry)
put_to_file(out)
```